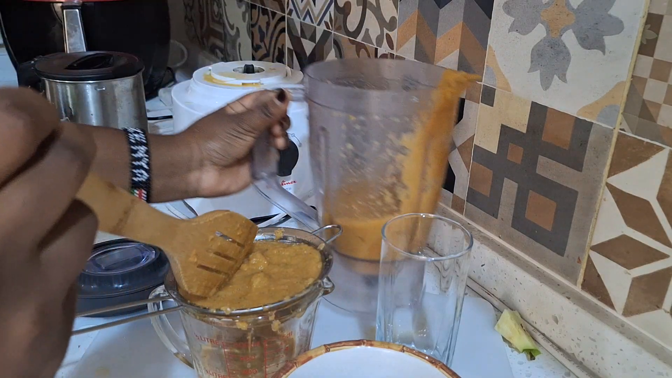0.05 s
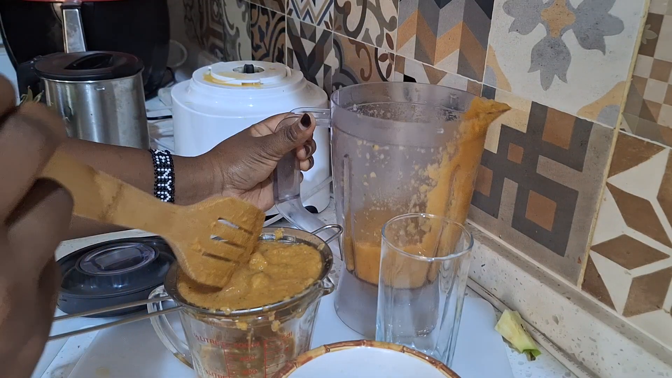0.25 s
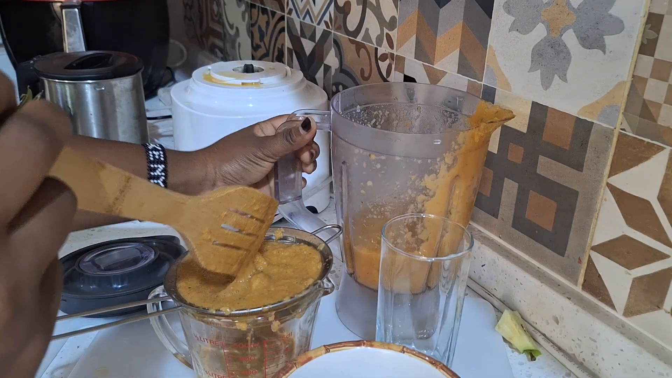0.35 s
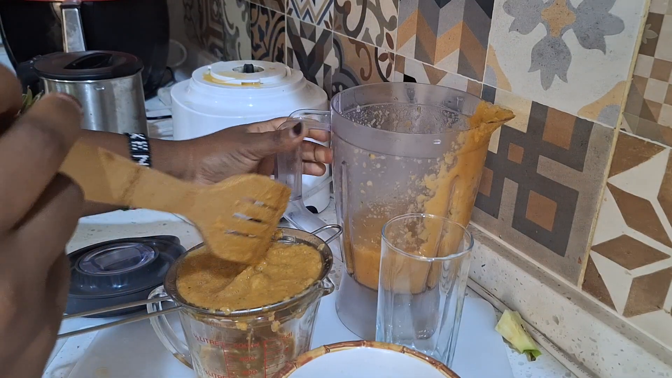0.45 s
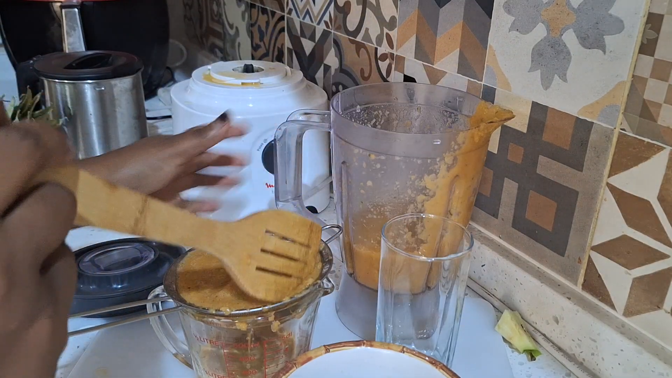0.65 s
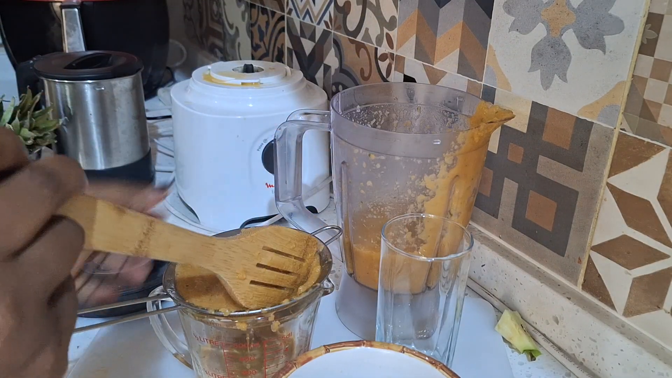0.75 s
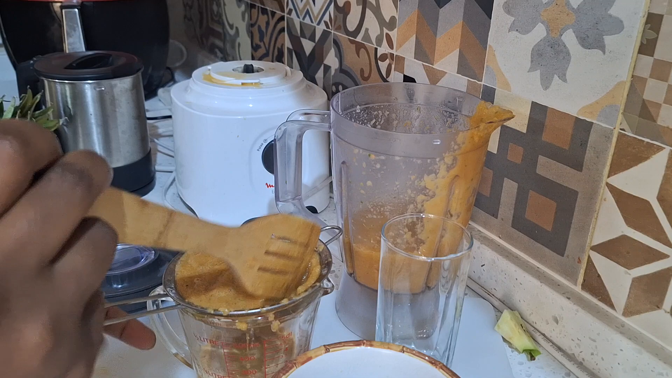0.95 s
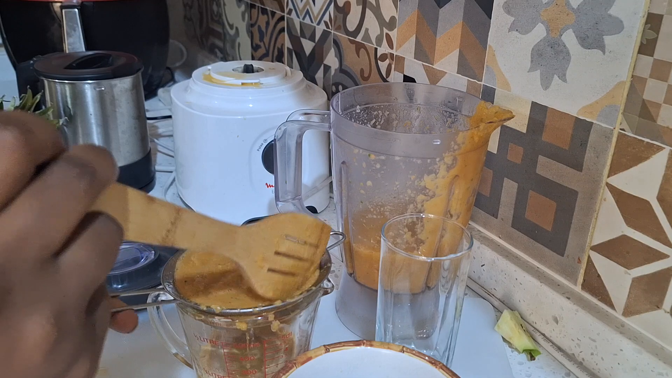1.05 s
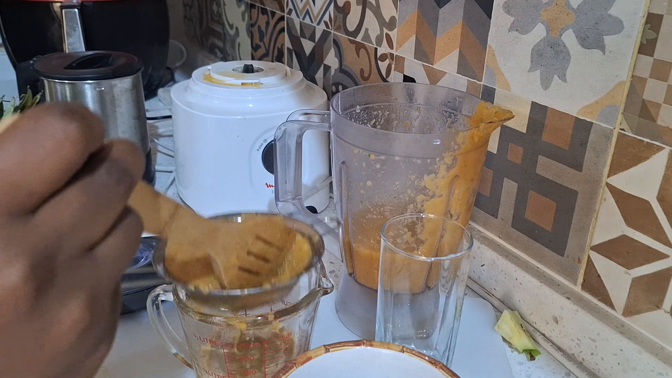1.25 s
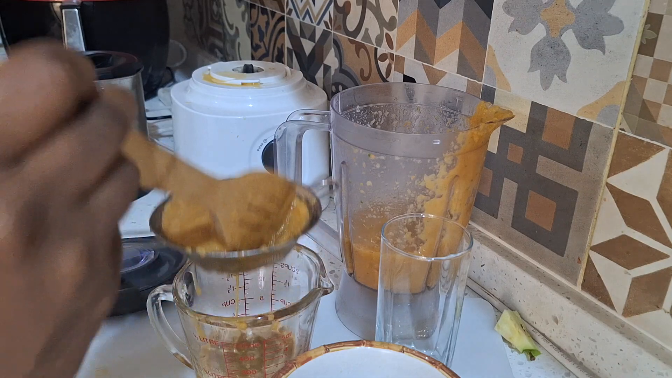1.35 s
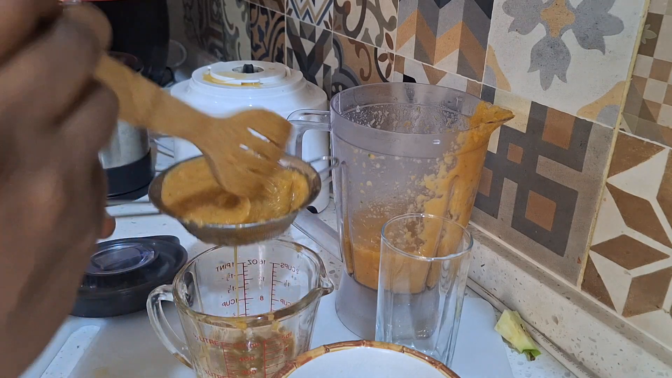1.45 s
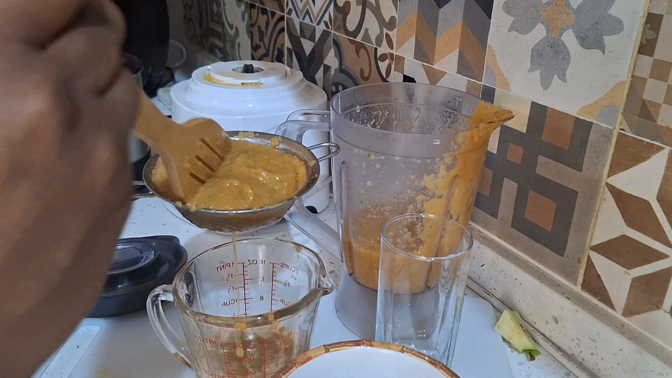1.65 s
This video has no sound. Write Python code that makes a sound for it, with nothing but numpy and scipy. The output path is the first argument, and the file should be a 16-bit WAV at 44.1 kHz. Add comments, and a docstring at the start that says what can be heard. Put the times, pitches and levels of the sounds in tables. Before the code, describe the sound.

Close stereo pickup in a tiled, lightly echoing kitchen: low appliance hum, a boomy jug thud with quick fading bumps, quiet wet mesh scraping and tiny squeaks, finally a wooden clack on the sieve rim.

```python
"""Straining fruit pulp in a tiled kitchen; wavering hum tones over noise rumble and room air throughout.
First a heavy blender jug thuds onto the counter and rocks to rest: struck modes plus clacks of decaying noise.
Then a wooden spatula drags pulp over a mesh sieve: random grains under stroke envelopes, with sticky noise clicks
and faint gliding tones as the rim squeaks on the jug. Near the end the spatula knocks the sieve: noise plus modes."""
import sys
import numpy as np
from scipy import signal
from scipy.fft import rfft, irfft
from scipy.io import wavfile

SR = 44100
rng = np.random.default_rng(int(sys.argv[2]) if len(sys.argv) > 2 else 0)


def pcm_store(signal):
    """Save signal as 16-bit PCM."""
    levels = np.round(np.clip(np.atleast_2d(signal), -1, 1) * 32767)
    wavfile.write(sys.argv[1], SR, levels.astype(np.int16).T)


N = 74970


def amp(db):
    """Decibels to gain."""
    return 10 ** (np.asarray(db) / 20)


def unit(x):
    """Scales to rms 1."""
    return x / np.sqrt(np.mean(x ** 2) + 1e-20)


def read(points, hz, axis=1):
    """Interpolates a table column along log frequency."""
    points = np.array(points)
    return np.interp(np.log(hz + 1), np.log(points[:, 0]), points[:, axis])


def pan(db):
    """Left and right gains for a left-right level difference."""
    return amp([[db / 2], [-db / 2]])


def add(mix, start_s, sound):
    """Mixes a sound in at a time, cut at the end of the mix."""
    part = mix[:, round(start_s * SR):][:, :sound.shape[-1]]
    part += sound[..., :part.shape[1]]


def colour(x, points):
    """Shapes a signal's spectrum by a table, at rms 1."""
    size = x.shape[-1]
    gain = amp(read(points, np.fft.rfftfreq(size, 1 / SR)))
    return unit(irfft(rfft(x) * gain, size))


def drift(rate_hz):
    """Random motion: noise under a Gaussian low-pass, rms 1."""
    hz = np.fft.rfftfreq(N, 1 / SR)
    lowpass = np.exp(-(hz / rate_hz) ** 2)
    return unit(irfft(rfft(rng.standard_normal(N)) * lowpass, N))


def burst(points, t60_s, rise_s, likeness, size=8192):
    """A contact as coloured, quickly dying noise; likeness is the left-right correlation."""
    t = np.arange(size) / SR
    a, b = irfft(np.exp(2j * np.pi * rng.random((2, size // 2 + 1))))  # flat spectrum, random phase
    same = np.clip(likeness, -1, 1)
    pair = np.array([a, same * a + np.sqrt(1 - same ** 2) * b])
    envelope = np.minimum(t / rise_s, 1) * amp(-60 * t / t60_s)
    return colour(pair, points) * envelope


def ring(modes, contact_ms):
    """Struck modes as decaying sines; a longer contact excites the high ones less."""
    t = np.arange(SR // 2) / SR
    out = np.zeros(len(t))
    for hz, db, t60_s in modes:
        softness = 1 + (2 * hz * contact_ms / 1000) ** 2
        out += amp(db - 60 * t / t60_s) * np.sin(2 * np.pi * hz * t) / softness
    return out


def kitchen(x):
    """Dense reflections off the tiles: noise whose bands each decay at their own speed."""
    # reverberation: f/Hz, t60/s, relative level/dB
    room = [(100, 0.17, 0), (415, 0.65, 2.5), (1000, 0.59, 1), (2200, 0.7, -4), (4500, 0.6, -2),
            (8000, 0.46, -4), (15000, 0.41, -1.5)]
    delay_s = 0.0051
    hz, t, bands = signal.stft(rng.standard_normal((2, SR)), SR, nperseg=256)
    level_db = read(room, hz, axis=2)[:, None] - 60 * t / read(room, hz)[:, None]
    tail = signal.istft(bands * amp(level_db), SR, nperseg=256)[1]
    tail = tail * np.clip(np.arange(tail.shape[1]) / SR / delay_s - 1, 0, 1)  # silent, then fades in
    tail = tail / np.linalg.norm(tail) * np.sqrt(2)
    return signal.fftconvolve(x, tail, axes=1)[:, :N]


def background():
    """Appliance hum of sines wavering in level and phase, over low rumble and room air of shaped noise."""
    # hum tones: f/Hz, level/dB rms, waver/dB rms
    hum_tones = [(100.57, -40, 2.55), (145.3, -55.5, 5)]
    # rumble spectrum, mostly common to both ears: f/Hz, relative level/dB
    rumble_spectrum = [(20, -15), (40, 0.5), (62, 5), (85, -7), (110, 2.5), (150, -6), (200, -24),
                       (340, -17.5), (500, -26), (750, -31), (1200, -49.5), (3000, -69.5)]
    # air spectrum, independent in each ear: f/Hz, relative level/dB
    air_spectrum = [(25, -22.5), (100, 12.5), (200, -2.5), (350, -1), (600, -3), (1000, -15), (1400, -19.5),
                    (2000, -23), (3500, -31), (6500, -36), (8300, -31.5), (10000, -39), (16000, -34)]
    rumble_db, spread_db = -43.5, -13.5
    air_db, air_balance_db = -55.5, 3
    t = np.arange(N) / SR
    hum = np.zeros(N)
    for hz, db, waver_db in hum_tones:
        waver = amp(waver_db * drift(rate_hz=90))
        phase_rad = 2 * np.pi * hz * t + 0.43 * drift(rate_hz=3.8)
        hum += amp(db) * unit(waver * np.sin(phase_rad))
    common = rng.standard_normal(N)
    spread = amp(spread_db) * rng.standard_normal((2, N))
    rumble = amp(rumble_db) * colour(common + spread, rumble_spectrum)
    air = amp(air_db) * pan(air_balance_db) * colour(rng.standard_normal((2, N)), air_spectrum)
    return hum + rumble + air


def rim_squeaks():
    """Friction makes the wet rim sing briefly: sines with glide, pitch jitter and level flutter."""
    # squeaks: start/s, length/s, level/dB, f/Hz, glide/share of f
    squeaks = [(0.764, 0.067, -82, 1550, 0.03), (1.013, 0.079, -65.5, 1525, 0.015),
               (1.105, .04, -84, 1546, 0), (1.151, 0.061, -69, 1554, -0.028),
               (1.596, 0.0097, -63.5, 2530, 0), (1.67, 0.015, -48, 1840, -0.22),
               (1.681, .03, -44, 1530, 0.056), (1.6905, 0.0087, -44.5, 3910, -0.26)]
    jitter, flutter_db, wet_db = 0.013, 3, -8  # jitter as rms share of f
    out = np.zeros((2, N))
    for start_s, length_s, db, hz, glide in squeaks:
        u = np.arange(0, length_s, 1 / SR) / length_s
        pitch_hz = hz * (1 + glide * u + jitter * drift(rate_hz=320)[:len(u)])
        turns = np.cumsum(pitch_hz) / SR
        flutter = amp(db + flutter_db * drift(rate_hz=240)[:len(u)])
        level = flutter * np.sin(np.pi * u ** 0.77)
        add(out, start_s, np.sqrt(2) * level * np.sin(2 * np.pi * turns))
    return out, out * amp(wet_db)


def scraping():
    """Tiny random slips over the wires, swelling and fading with each stroke."""
    # spatula strokes: start/s, length/s, level/dB
    strokes = [(0.35, .11, -64), (.715, 0.17, -69.5), (1.0, .1, -77), (1.112, 0.17, -71.5),
               (1.36, .08, -92), (1.53, .2, -70)]
    # wire mesh spectrum: f/Hz, relative level/dB
    mesh = [(1000, -31), (2000, 5.5), (2400, -18), (2800, 1.5), (3200, -4.5), (3700, 2), (4100, -5.5),
            (4600, -0.5), (5500, -6), (7000, -11), (8300, 1), (9500, -8.5), (12000, -9.5), (15500, -18)]
    grains_per_s, spread_db, wet_db = 1300, 3.5, -4
    sizes = amp(spread_db * np.minimum(rng.exponential(1, N), 5))
    grains = sizes * (rng.random(N) < grains_per_s / SR)
    pressure = np.zeros((2, N))
    for start_s, length_s, db in strokes:
        u = np.arange(0, length_s, 1 / SR) / length_s
        add(pressure, start_s, amp(db) * np.sin(np.pi * u ** 0.66))
    out = pressure * colour(grains * rng.standard_normal((2, N)), mesh)
    return out, out * amp(wet_db)


def pulp_clicks():
    """Small wet films snap: noise bursts, each in a broad band that falls steeply below its centre."""
    # clicks of pulp and juice: t/s, level/dB, centre f/Hz, width/octaves, left-right difference/dB
    clicks = [(0.429, -52.5, 9900, 1, -3.5), (0.7092, -50, 6940, 1, -0.5), (0.7466, -60, 5500, 0.97, 4),
              (0.766, -63, 8000, 0.74, -6), (1.0537, -59, 7900, 0.76, -1), (1.151, -63.5, 6900, 0.43, -2),
              (1.2416, -59.5, 7500, 0.81, 0), (1.539, -50.5, 5370, 0.62, -3), (1.5775, -59, 9000, 0.91, -4),
              (1.5952, -53, 3650, 0.98, 4), (1.6222, -51, 5100, 1, -5), (1.6694, -40.5, 2460, 0.57, 2),
              (1.6903, -37.5, 3700, 0.73, -1)]
    wet_db = -2
    out = np.zeros((2, N))
    hz = np.geomspace(100, SR / 2, num=40)
    for start_s, db, centre_hz, octaves, side_db in clicks:
        away = np.log2(hz / centre_hz) / octaves
        band_db = -20 * np.log10(1 + away ** 2 + .5 * np.minimum(away, 0) ** 6)
        snap = burst(np.c_[hz, band_db], t60_s=0.027, rise_s=0.0015, likeness=0.13)
        add(out, start_s, amp(db) * pan(side_db) * snap)
    return out, out * amp(wet_db)


def spatula_knock():
    """Wood clacks on the steel rim as a noise burst and briefly rings the bowl's modes."""
    # knock: t/s, noise level/dB
    knock = (1.612, -31)
    # wood on steel rim, spectrum: f/Hz, relative level/dB
    wood_on_steel = [(300, -27), (730, 10), (950, 3), (1200, -11), (1600, -1), (2500, -3), (3600, -10.5),
                     (4800, -5.5), (6500, -17), (8300, -16.5), (15000, -43)]
    # sieve bowl modes, damped by pulp: f/Hz, level before contact softening/dB, t60/s
    bowl_modes = [(725, -37, 0.041), (960, -48.5, .09), (1543, -50, 0.054), (2622, -49, .025)]
    wet_db = -5.5
    start_s, db = knock
    out = np.zeros((2, N))
    add(out, start_s, amp(db) * burst(wood_on_steel, t60_s=0.046, rise_s=0.0015, likeness=0.13))
    add(out, start_s, ring(bowl_modes, contact_ms=0.11))
    return out, out * amp(wet_db)


def jug():
    """Each landing pushes counter and jug in opposite directions, with a clack of hard plastic."""
    # landing and rocking: t/s, thump gain/dB, contact time/ms, clack gain/dB
    blows = [(.2106, -9.5, 0.092, -0.5), (0.2216, -5.5, 3.7, -23.5), (0.2498, -14.8, 0.47, -17.5),
             (0.2882, -18.4, 3.6, -36), (0.3286, -21.5, 3.1, -39), (0.3682, -26.5, 2.7, -23.5)]
    # counter modes: f/Hz, relative level/dB, t60/s
    counter_modes = [(76.05, -9.5, 0.28), (101.74, -6.5, 0.29), (123.97, -4.5, .7)]
    # jug modes: f/Hz, relative level/dB, t60/s
    jug_modes = [(274.5, -6.5, 0.16), (283.8, -18, 0.283), (322, -1.5, 0.063), (359, -8.5, 0.066),
                 (405.5, -29.5, 0.37), (555, -23, 0.21), (827, -8.5, 0.048), (1000, -24.5, 0.27),
                 (1615, -39, .16), (1900, -24.5, 0.068), (3000, -34.5, 0.28)]
    # hard plastic contact spectrum: f/Hz, relative level/dB
    plastic = [(100, -15), (400, -1), (850, 2.5), (1400, -11), (2050, -6), (3000, -14), (5000, -16),
               (6600, -24), (8000, -22), (9500, -30.5), (15500, -42)]
    all_clacks_db, balance_db = -15, -6
    boom_wet_db, ring_wet_db, clack_wet_db = -17.5, -16.5, -3.5
    booms, rings, clacks = np.zeros((3, 2, N))
    for start_s, thump_db, contact_ms, clack_db in blows:
        add(booms, start_s, amp(thump_db) * ring(counter_modes, contact_ms))
        add(rings, start_s, -amp(thump_db) * ring(jug_modes, contact_ms))
        clack = burst(plastic, t60_s=.04, rise_s=0.0009, likeness=0)
        add(clacks, start_s, amp(all_clacks_db + clack_db) * clack)
    direct = booms + rings + clacks * pan(balance_db)
    sent = booms * amp(boom_wet_db) + rings * amp(ring_wet_db) + clacks * amp(clack_wet_db)
    return direct, sent


def scene():
    """Sources direct and through the kitchen, over the background."""
    sources = [jug(), pulp_clicks(), spatula_knock(), scraping(), rim_squeaks()]
    direct, sent = np.sum(sources, axis=0)
    return direct + kitchen(sent) + background()


def record(dry):
    """Bass roll-off, tanh rounding of the highest peaks, then a treble band limit."""
    # overload: start, ceiling (share of full scale)
    overload = (.4, .78)
    low_cut_hz, cutoff_hz = 51.7, 16100
    thinned = signal.sosfilt(signal.butter(2, low_cut_hz, "highpass", fs=SR, output="sos"), dry)
    knee, top = overload
    clean = np.clip(thinned, -knee, knee)
    rounded = clean + (top - knee) * np.tanh((thinned - clean) / (top - knee))
    band_limit = signal.firwin(511, cutoff_hz, window=("kaiser", 9), fs=SR)
    return signal.oaconvolve(rounded, band_limit[None], "same")


dry = scene()
out = record(dry)
pcm_store(out)
```